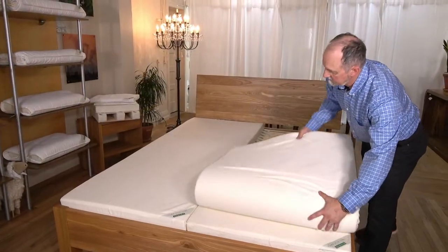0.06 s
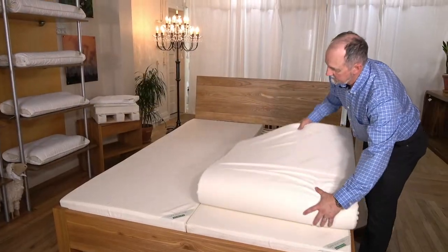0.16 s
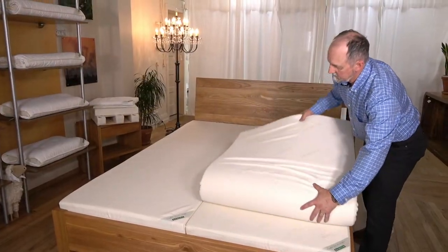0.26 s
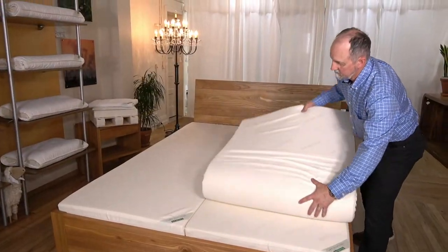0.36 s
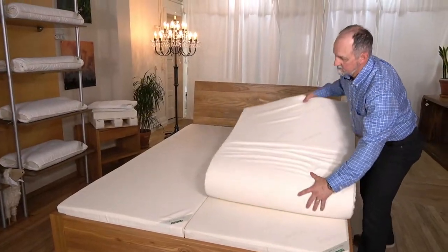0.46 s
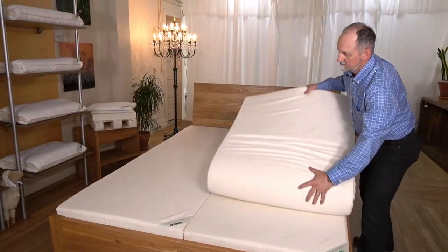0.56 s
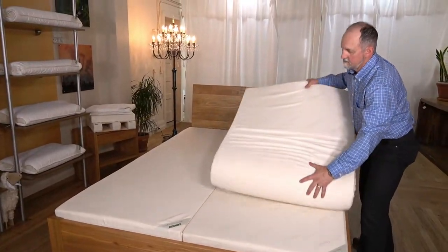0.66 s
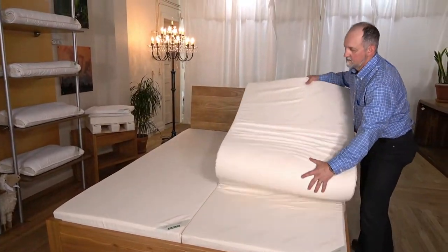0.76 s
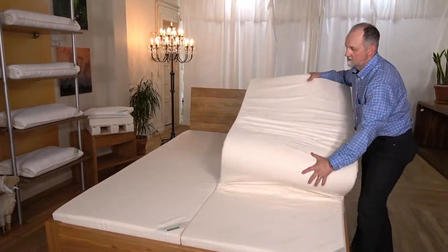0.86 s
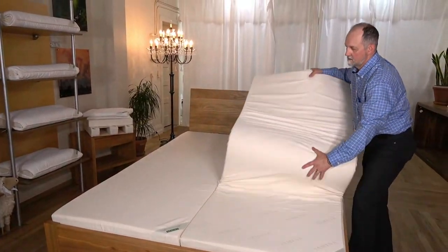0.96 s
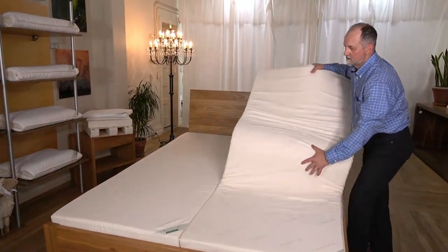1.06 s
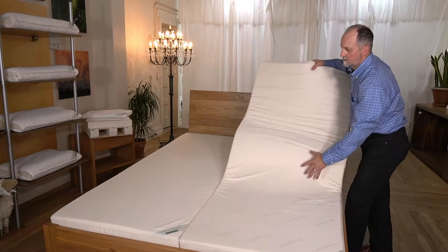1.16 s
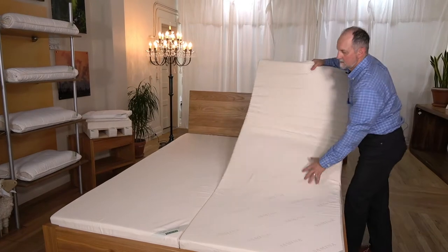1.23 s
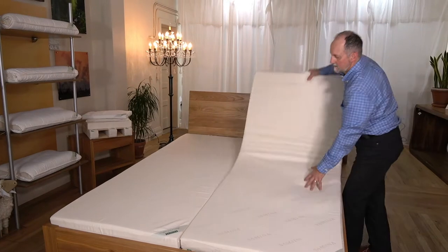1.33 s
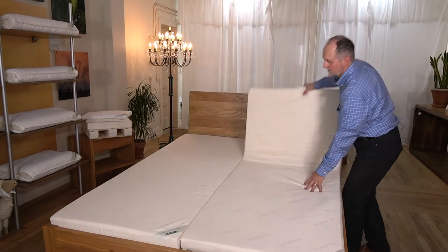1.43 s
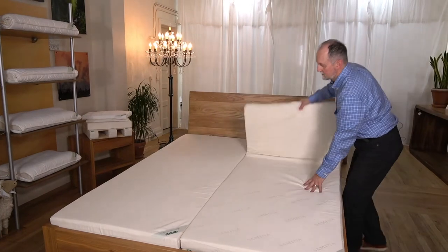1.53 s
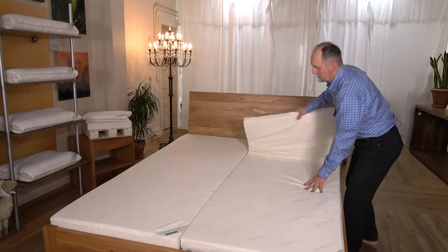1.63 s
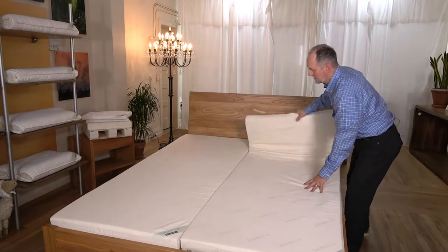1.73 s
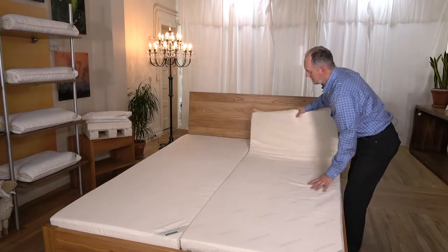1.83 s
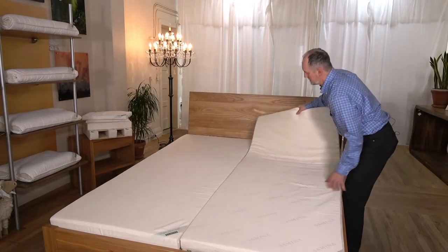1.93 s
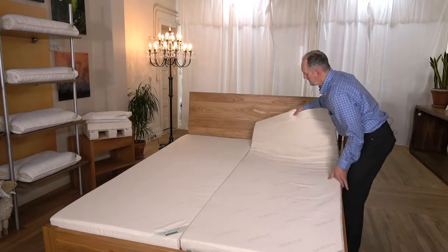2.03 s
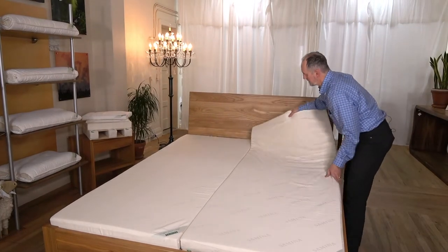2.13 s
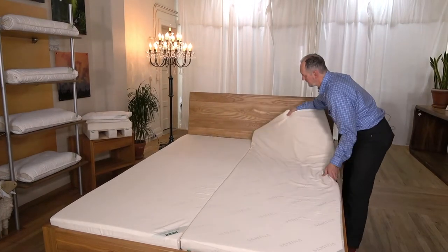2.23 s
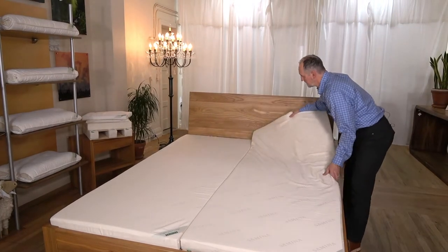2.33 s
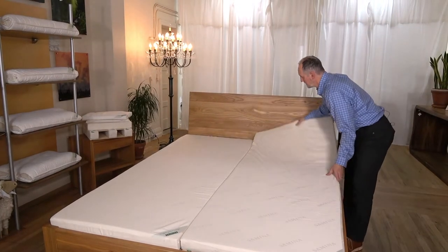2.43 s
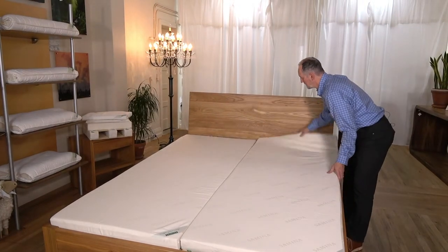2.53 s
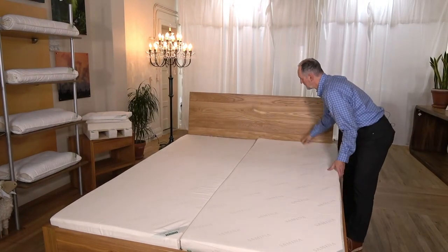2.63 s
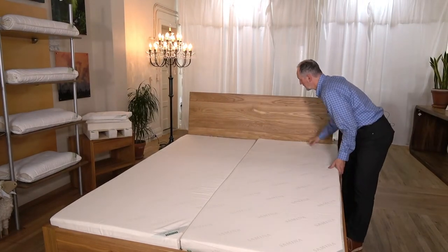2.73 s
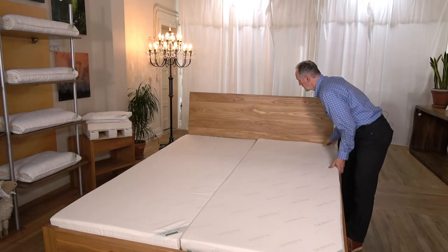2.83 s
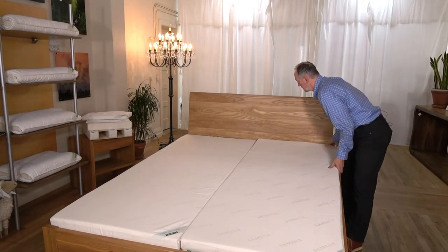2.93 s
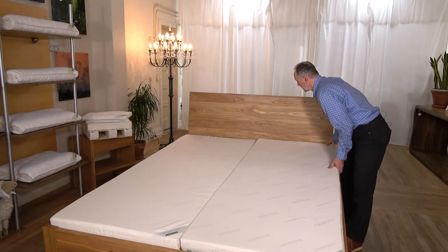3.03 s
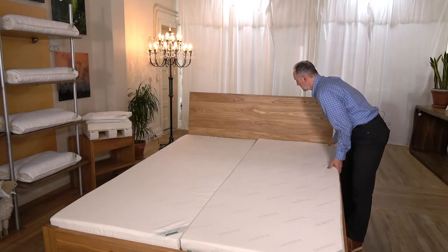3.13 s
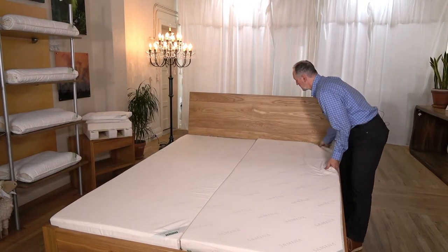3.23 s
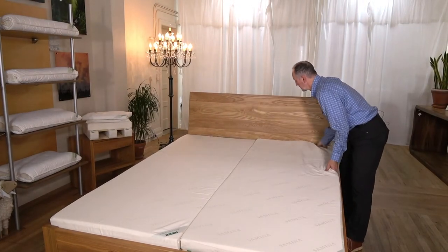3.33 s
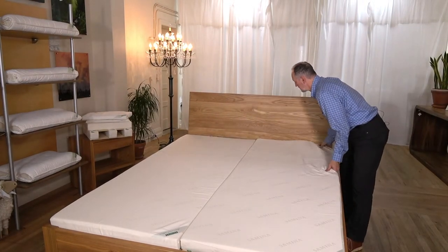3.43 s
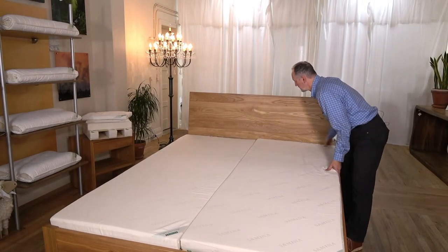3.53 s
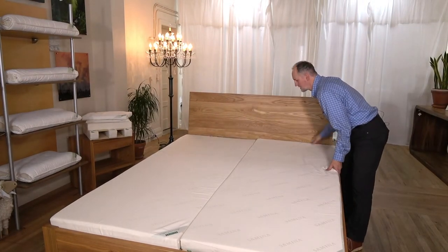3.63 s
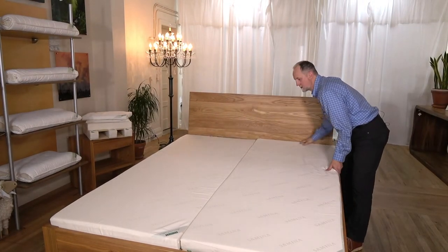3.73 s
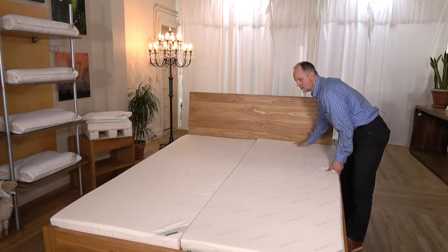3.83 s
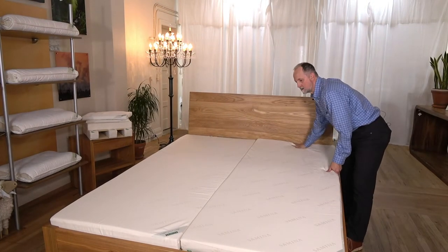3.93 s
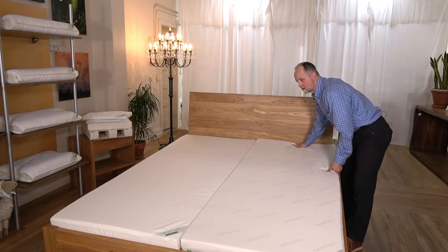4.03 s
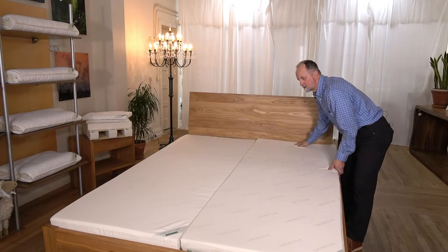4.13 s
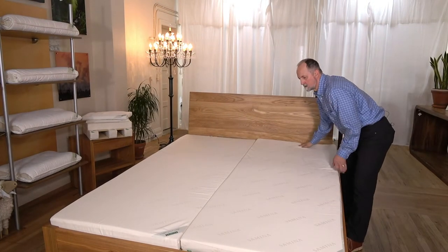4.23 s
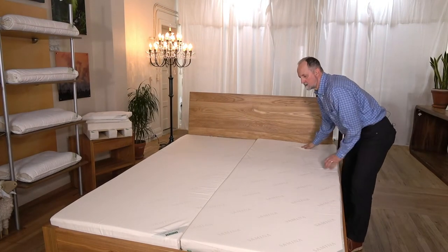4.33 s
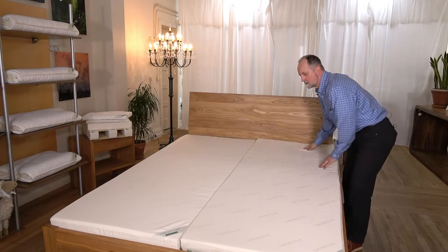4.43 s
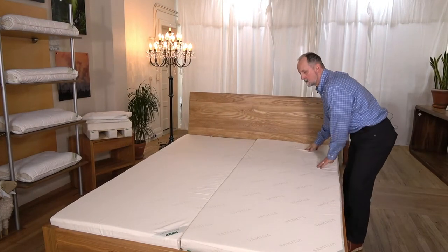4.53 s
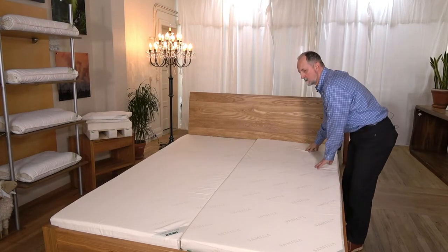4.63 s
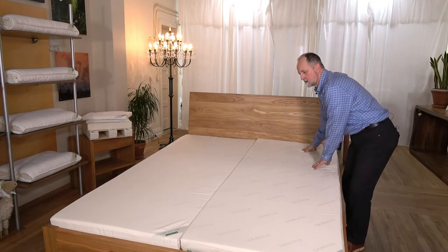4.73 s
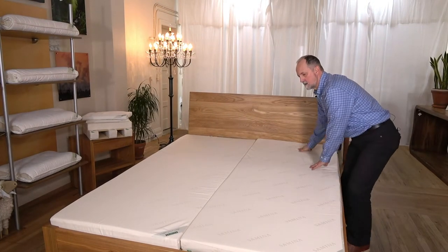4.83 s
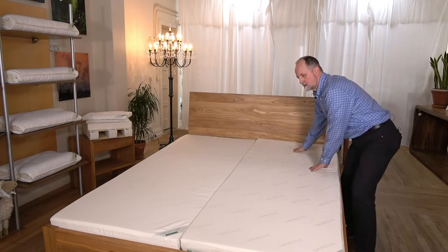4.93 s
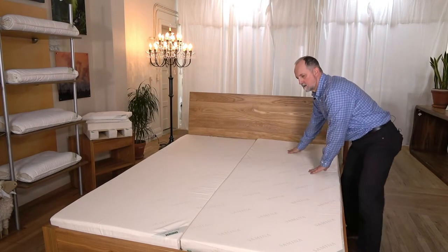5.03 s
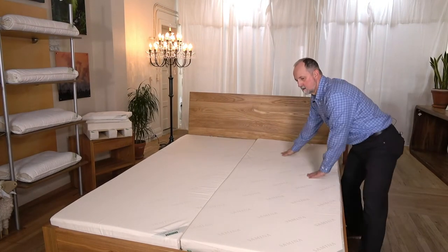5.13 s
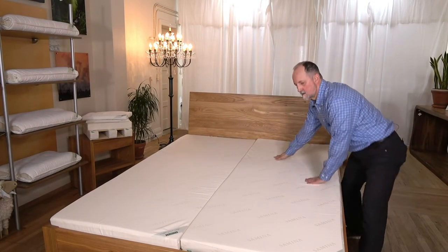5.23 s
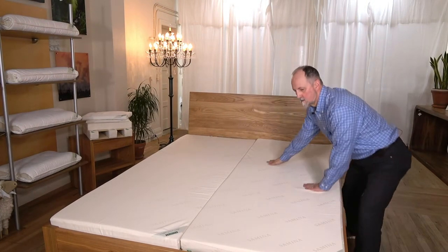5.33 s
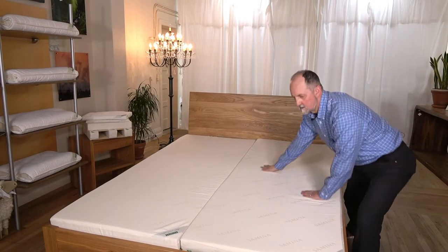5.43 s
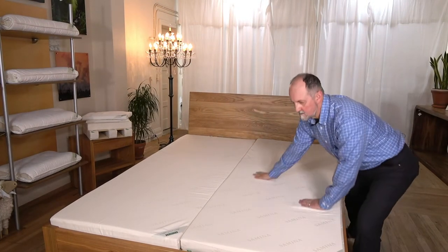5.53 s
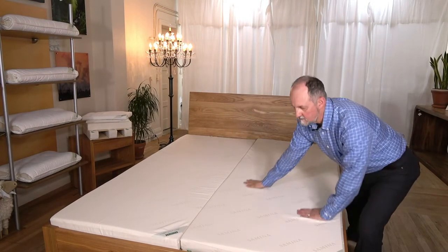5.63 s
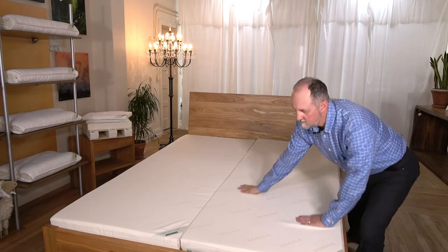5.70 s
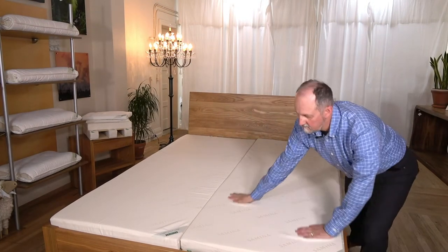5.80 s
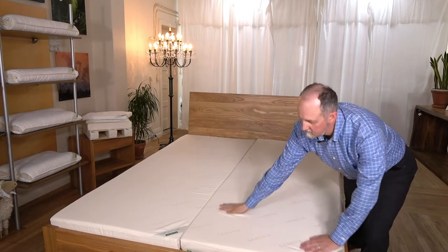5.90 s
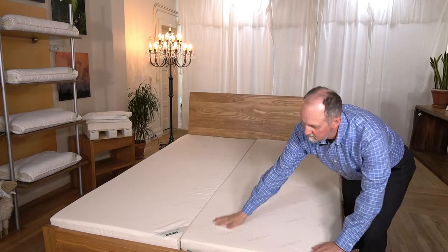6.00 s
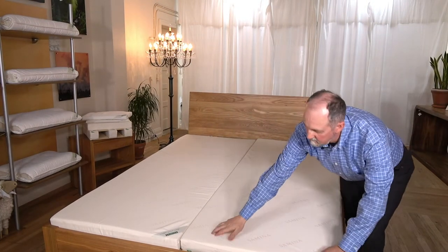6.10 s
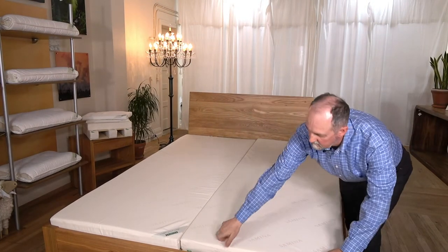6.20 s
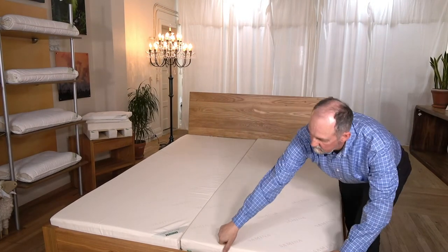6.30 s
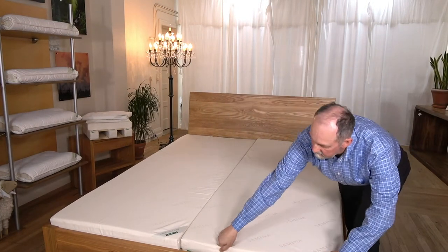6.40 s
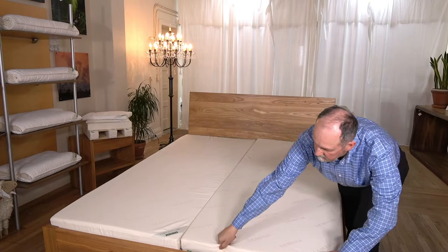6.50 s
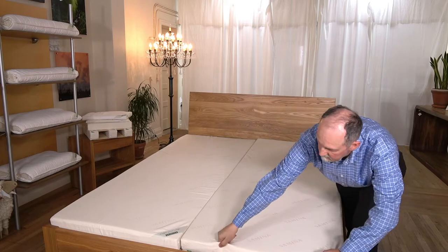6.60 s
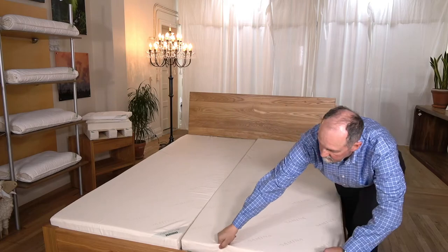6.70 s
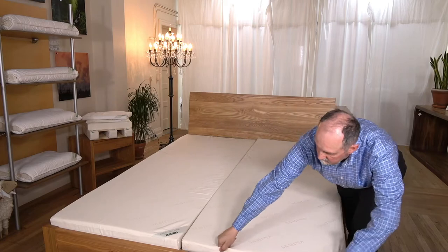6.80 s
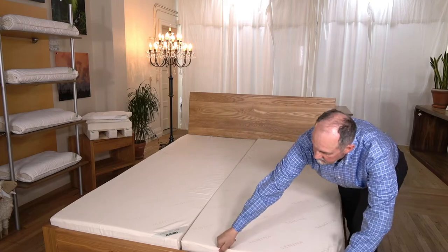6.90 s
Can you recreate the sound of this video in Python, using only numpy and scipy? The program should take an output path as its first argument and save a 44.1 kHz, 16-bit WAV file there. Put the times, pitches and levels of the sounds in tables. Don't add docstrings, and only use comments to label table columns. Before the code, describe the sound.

A soft rubber pad rustles quietly, flops onto wooden slats with dull thuds, is tugged with cloth snaps, then brushed smooth by a sweeping palm.

```python
import sys
import numpy as np
from scipy import signal
from scipy.fft import rfft, irfft, next_fast_len
from scipy.io import wavfile
from scipy.ndimage import uniform_filter1d, map_coordinates

SR = 44100
rng = np.random.default_rng(int(sys.argv[2]) if len(sys.argv) > 2 else 0)


def unload_audio(sound):
    columns = np.transpose(np.atleast_2d(sound))
    steps = np.round(np.clip(columns, -1, 1) * 32767)
    wavfile.write(sys.argv[1], SR, steps.astype(np.int16))


def rack_gain(trim_db):
    fader = np.asarray(trim_db, float)
    return 10 ** (fader / 20)


N = 306709

# (time [s], speed [dB], load on the quilting [dB], flatness [0-1])
PALM_SWEEP = [
    (4.85, -88, -95, 0),
    (5.0, -68.5, -76, 0),
    (5.22, -58, -81, 0),
    (5.45, -54.5, -84, 0.45),
    (5.65, -52, -71, .46),
    (5.8, -52.5, -62, 0.46),
    (6.07, -55, -64, 1),
    (6.17, -67, -74, 0.5),
    (6.3, -89, -90, .3),
]
# (frequency [Hz], level [dB per Hz])
KNOCK_COLOUR = [(150, -35), (400, 19.5), (800, 12.5), (1300, 8), (1900, -35), (4000, -71)]


def unit(x):
    return x / np.sqrt(np.mean(x ** 2) + 1e-20)


def along(points, hz):
    f, v = np.transpose(points)
    return np.interp(np.log(hz + 1), np.log(f + 1), v)


def curves(rows):
    times, *columns = np.transpose(rows)
    return [np.interp(np.arange(N) / SR, times, column) for column in columns]


def wobble(rate):
    knots = rng.standard_normal(int(N * rate / SR) + 4)
    return map_coordinates(knots, [np.arange(N) * rate / SR])


def filtered(x, response):
    m = next_fast_len(N + SR // 2)
    return irfft(rfft(x, m) * response(np.fft.rfftfreq(m, 1 / SR)), m)[..., :N]


def coloured(x, spectrum):
    return unit(filtered(x, lambda hz: rack_gain(along(spectrum, hz))))


def friction(rate, spread_db, smooth):
    strength = rng.standard_normal(N) * rack_gain(spread_db * rng.exponential(size=N))
    slips = (rng.random(N) < rate / SR) * strength
    return np.sqrt(1 - smooth) * unit(slips) + np.sqrt(smooth) * rng.standard_normal(N)


def patchy(x, depth_db, count):
    z = signal.stft(x, nperseg=1024)[2]
    field = uniform_filter1d(rng.standard_normal(z.shape), count, 0)
    field = uniform_filter1d(field, 10, 1)
    return signal.istft(z * rack_gain(depth_db * unit(field)), nperseg=1024)[1][:N]


def gestures(rows, rise_db_s, fall_db_s):
    start, hold, db = np.transpose(rows)[:, :, None]
    t = np.arange(0, N, 32) / SR
    lost_db = rise_db_s * np.maximum(start - t, 0) + fall_db_s * np.maximum(t - start - hold, 0)
    lost_db = lost_db / (1 + hold / 0.57)
    power = (rack_gain(db - np.minimum(lost_db, 150)) ** 2).sum(axis=0)
    return np.interp(np.arange(N) / SR, t, 10 * np.log10(power))


def still_air():
    # (frequency [Hz], level [dB per Hz])
    air_colour = [(59, -41), (100, -3), (219, -5.5), (891, -13.5), (2520, -23), (4200, -26), (9020, -27.5),
                  (14400, -29.5), (16000, -31)]
    return rack_gain(-61) * coloured(rng.standard_normal(N), air_colour)


def room(x):
    # (frequency [Hz], time to fall 60 dB [s])
    fading = [(100, 0.56), (1000, 0.1), (10000, 0.48)]
    hz, t, z = signal.stft(rng.standard_normal(SR // 2), SR, nperseg=256)
    fade = rack_gain(-60 * t / along(fading, hz)[:, None])
    tail = signal.istft(z * fade, SR, nperseg=256)[1]
    delayed = np.pad(x, (200, 0))
    return signal.fftconvolve(delayed, tail / np.linalg.norm(tail))[:N]


def frame():
    # (frequency [Hz], level [dB], time to fall 60 dB [s])
    frame_modes = [(125.3, 2.5, 0.73), (197.7, -1.5, 0.54), (244, -12.5, 0.13), (296, -10, 0.49),
                   (491, -1.5, 0.26), (918, -3, 0.16)]
    # (time [s], level [dB])
    jolts = [
        (1.40, -52),
        (2.661, -46.5),
        (3.068, -51.5),
        (3.567, -43),
        (3.588, -44.5),
        (5.295, -47.5),
    ]
    out, t = np.zeros(N + SR), np.arange(SR // 2) / SR
    for s, db in jolts:
        hum = np.zeros(len(t))
        for hz, level, t60 in frame_modes:
            loudness = rack_gain(level + rng.normal(0, 1.7) - 60 * t / t60)
            hum += loudness * np.sin(2 * np.pi * hz * t) * (1 - np.exp(-t * hz / 3))
        out[round(s * SR):][:len(t)] += rack_gain(db) * hum
    return out[:N]


def handling():
    # (start [s], hold [s], force [dB], slip on the sheet [dB])
    moves = [(0, 0.21, -61.5, 4), (0.215, 0.09, -53.5, -7.5), (0.348, 0.26, -61.5, 1.5),
             (0.673, .3, -60.5, -3), (1.07, 0.18, -59, -4.5), (1.27, 0.04, -42.5, -9.5),
             (1.326, 0.015, -41, -11.5), (1.405, 0.0053, -39.5, -12), (1.455, 0.14, -53, -11),
             (1.847, 0.14, -65, -0.5), (2.027, 0.032, -46.5, -13), (2.14, 0.019, -42.5, -10),
             (2.252, .21, -59.5, 3), (2.526, .06, -51, -10.5), (2.648, .015, -32, -11.5),
             (2.738, 0.14, -59.5, -6.5), (2.895, 0.023, -56.5, -2.5), (3.081, 0.073, -52.5, -15),
             (3.243, .1, -46.5, -10.5), (3.468, .05, -57.5, 0.5), (3.563, 0.023, -42, -7),
             (3.69, 0.039, -62.5, -1.5), (3.823, 0.13, -56.5, -1.5), (4.146, 0.33, -63.5, -0.5),
             (4.537, 0.31, -59.5, -6), (5.017, 0.28, -67.5, 5), (5.31, 0.23, -50, -5),
             (5.575, 0.49, -51.5, -2), (6.116, 0.17, -62.5, 7), (6.357, 1, -59.5, 0.5)]
    # (start [s], hold [s], level [dB])
    leans = [
        (0, 0.52, -50.5),
        (2.1, 0.26, -49),
        (3.19, 0.05, -46.5),
        (3.54, 0.027, -43.5),
        (5.27, 0.17, -41),
        (6.8, .15, -55.5),
    ]
    # (frequency [Hz], level [dB per Hz])
    heave_colour = [(8.8, 3), (15, -6), (38, 4.5), (64, -3.5), (80, -1), (108, -10.5), (200, -19),
                    (260, -74), (440, -120)]
    crease_colour = [(60, -22), (120, 3.5), (200, 0), (400, -4.5), (700, -12), (1500, -28), (3000, -120)]
    rub_colour = [(200, -46), (450, -1), (800, -0.5), (1200, -3.5), (1750, -10.5), (2250, -17.5),
                  (6000, -37), (16000, -120)]
    rise_db_s, fall_db_s = 437, 311
    crease_db = gestures([move[:-1] for move in moves], rise_db_s, fall_db_s)
    rubs = [(s, hold, db + slip_db) for s, hold, db, slip_db in moves]
    rub_db = gestures(rubs, rise_db_s, fall_db_s)
    lean_db = gestures(leans, rise_db_s=207, fall_db_s=102)

    swell = np.sqrt(rack_gain(-51) ** 2 + rack_gain(-16 + 0.7 * crease_db) ** 2 + rack_gain(lean_db) ** 2)
    heave = swell * coloured(rng.standard_normal(N), heave_colour)
    lumps = coloured(friction(250, 1.5, smooth=0.5), crease_colour)
    crease = rack_gain(crease_db - 1 + 1.5 * wobble(30)) * lumps
    swish = patchy(friction(2500, 1.2, smooth=0.8), depth_db=1.7, count=5)
    return heave + crease + rack_gain(rub_db) * coloured(swish, rub_colour)


def palm():
    # (start [s], end [s], from [Hz], to [Hz], level [dB])
    whistles = [(5.04, 5.3, 850, 1480, -64), (5.28, 5.42, 1440, 1560, -64), (5.43, 5.54, 1740, 1900, -59),
                (5.52, 5.7, 1940, 1880, -63), (5.33, 5.52, 2130, 2190, -63), (5.27, 5.52, 2880, 2990, -59),
                (5.62, 5.72, 3060, 2960, -58), (5.73, 5.92, 2860, 2980, -59), (5.74, 5.86, 2480, 2490, -54),
                (5.6, 5.68, 3700, 3740, -61), (6.08, 6.2, 800, 880, -65), (6.2, 6.36, 1500, 1000, -65)]
    _, load_db, _ = curves(PALM_SWEEP)
    bump_colour = KNOCK_COLOUR[:3] + [(1300, -12), (2500, -120)]
    out = rack_gain(load_db) * coloured(friction(70, 1.4, smooth=0.037), bump_colour)
    for start, end, from_hz, to_hz, db in whistles:
        at = slice(round(start * SR), round(end * SR))
        u = np.linspace(0, 1, at.stop - at.start)
        pitch = from_hz + (to_hz - from_hz) * u + 24 * wobble(60)[at]
        swell = rack_gain(db + 1) * (1 + 0.7 * wobble(40)[at]) * np.sin(np.pi * u)
        out[at] += swell * np.sin(2 * np.pi * np.cumsum(pitch) / SR)
    return out


def sliding():
    # (start [s], hold [s], level [dB], skin drag over it [dB])
    rustles = [(0, 0.56, -64, -8), (0.557, 0.36, -66.5, -4), (0.943, 0.2, -69, -3),
               (1.256, 0.079, -64, 2.5), (1.437, 0.045, -70, 7.5), (1.52, 0.092, -71.5, 1.5),
               (1.7, 0.14, -75, 4), (1.89, 0.077, -67, -0.5), (1.988, 0.053, -68.5, 7),
               (2.134, .08, -70, 2), (2.26, 0.19, -68, 5.5), (2.57, 0.057, -60.5, 0),
               (2.641, 0.02, -54, -1), (2.706, 0.082, -69, 4), (2.842, 0.085, -62.5, -7),
               (3.08, .02, -83, 6), (3.11, 0.027, -68, -8), (3.22, 0.14, -63.5, 1),
               (3.468, 0.065, -66.5, -4), (3.53, 0.023, -58.5, -6), (3.684, 0.073, -70, 8.5),
               (3.812, 0.079, -62.5, -4), (3.88, 0.1, -69.5, 3), (4.156, .42, -65, -7),
               (4.576, 0.36, -68.5, 1.5), (6.014, 0.033, -51, -9), (6.19, .25, -66.5, -2),
               (6.5, 0.28, -70, 2), (6.884, 0.042, -67, -1)]
    # (time [s], delay [ms])
    mirror_delay = [
        (0, .21),
        (3.8, .2),
        (4.15, .142),
        (4.75, .135),
        (5.2, .36),
        (5.5, .345),
        (5.85, .32),
        (6.08, .26),
        (6.95, .2),
    ]
    # (frequency [Hz], level [dB per Hz])
    hiss_colour = [(600, -120), (1500, -1), (2500, -2.5), (4000, -5), (7000, 5.5), (10000, 3), (13000, 1.5),
                   (16000, -3)]
    skin_colour = [(900, -120), (1500, -4), (1900, 0.5), (2400, 4), (2900, 2.5), (3600, -2.5), (6000, -5),
                   (12000, -58)]
    rise_db_s, fall_db_s = 480, 450
    speed_db, _, flat = curves(PALM_SWEEP)
    rustle_db = gestures([rustle[:-1] for rustle in rustles], rise_db_s, fall_db_s)
    drags = [(s, hold, db + skin_db) for s, hold, db, skin_db in rustles]
    drag_db = gestures(drags, rise_db_s, fall_db_s)

    fibres = patchy(friction(9000, 1.3, smooth=0.85), depth_db=1.3, count=16)
    hiss = rack_gain(0.6 * wobble(20)) * coloured(fibres, hiss_colour)
    hiss = np.hypot(rack_gain(rustle_db), rack_gain(speed_db)) * hiss

    cupped = coloured(patchy(rng.standard_normal(N), depth_db=2.0, count=2), skin_colour)
    higher_colour = np.array(skin_colour) * [1.3, 1]
    spread = coloured(patchy(rng.standard_normal(N), depth_db=2.0, count=2), higher_colour)
    drag = np.hypot(rack_gain(drag_db), rack_gain(speed_db + 3.5))
    skin = rack_gain(-2.5) * drag * (np.sqrt(1 - flat) * cupped + np.sqrt(flat) * spread)

    direct, mirror_share = hiss + skin, 0.3
    late = np.arange(N) - curves(mirror_delay)[0] * SR / 1000
    mirrored = map_coordinates(uniform_filter1d(direct, size=3), [late])
    return (direct + mirror_share * mirrored) / np.sqrt(1 + mirror_share ** 2)


def snaps():
    # (time [s], peak [dB], knock over it [dB], time to fall 60 dB [s])
    snap_events = [(1.4446, -42, -3, 0.023), (2.094, -42, -15, .026), (2.138, -45, 11, .035),
                   (2.586, -39, -1, 0.068), (2.6327, -42, 10, 0.028), (2.6406, -25, -3, 0.032),
                   (2.6535, -15.5, 6, 0.023), (3.066, -44, -2, 0.025), (3.0742, -42, 6, 0.023),
                   (3.5406, -40.5, 11, 0.021), (3.564, -24, -2, 0.024), (3.586, -34, 2, 0.017),
                   (3.8176, -35, -13, .05), (3.832, -41, 0, .05), (6.027, -35.5, -2, 0.033)]
    # (frequency [Hz], level [dB per Hz])
    crack_colour = [(900, -12), (1700, -3), (2200, -3), (2700, -11), (3400, -0.5), (4300, -15), (5500, -8),
                    (9500, -13.5), (16000, -31)]
    bright, dull, t = np.zeros(N + SR), np.zeros(N + SR), np.arange(SR // 4) / SR
    for s, db, knock_db, t60 in snap_events:
        burst = rack_gain(db - 11 - 60 * t / t60) * (1 - np.exp(-t / 0.00082))
        knock_t60 = 1.87 * t60
        knock = rack_gain(db + knock_db - 7 - 60 * t / knock_t60) * (1 - np.exp(-t / 0.00027))
        bright[round(s * SR):][:len(t)] += burst
        dull[round(s * SR):][:len(t)] += knock
    crack = bright[:N] * coloured(rng.standard_normal(N), crack_colour)
    return crack + dull[:N] * coloured(rng.standard_normal(N), KNOCK_COLOUR)


def pushes():
    # (time [s], peak [dB], pitch [Hz], rebound relative to it [dB])
    thuds = [(1.2886, -27, 324, -20), (1.334, -22, 227, -17), (1.344, -23, 220, -8), (1.3964, -17, 200, -6),
             (1.407, -28, 123, -4), (1.4141, -21, 205, -10), (1.439, -30, 170, -12),
             (2.0292, -34.5, 140, -4), (2.578, -31.5, 330, -17), (2.5966, -26, 467, -13),
             (2.6341, -24.5, 440, -2.5), (2.643, -30, 610, -8), (2.652, -36, 500, -18),
             (2.6562, -11, 597, -15), (2.6643, -21, 310, -12), (2.6802, -25.5, 139, -1),
             (3.0727, -38, 625, -8), (3.082, -36, 240, -10), (3.3199, -46, 200, -15),
             (3.5438, -30, 290, 5.5), (3.5493, -32, 200, 10), (3.564, -31.5, 270, -3),
             (5.2948, -26.5, 460, 0)]
    # (time [s], peak [dB], pitch [Hz])
    taps = [(0.22, -37, 220), (0.2329, -35.5, 277), (.249, -35.5, 283), (0.3881, -36.5, 477),
            (0.611, -30.5, 388), (1.491, -35, 308), (1.6312, -34, 268), (2.15, -47, 306), (2.164, -40, 252),
            (2.263, -39.5, 310), (3.8333, -50.5, 356), (4.779, -41, 144), (5.687, -35, 500),
            (5.7281, -31.5, 540), (5.7567, -28.5, 327), (5.9256, -41, 610), (5.978, -36, 630),
            (6.02, -38, 590), (6.0429, -36.5, 650), (6.2291, -41, 900)]
    # (time [s], peak [dB], pitch [Hz], edge [dB])
    footfall = (6.8917, -20, 179, -44)
    # (frequency [Hz], width [Hz], level [dB])
    slats = [(71.4, 6.3, -4), (165, 17, -8), (413, 20, -39), (500, 79, -28), (900, 95, 21)]
    tap_edge_db, thud_edge_db = -13, -16
    contacts = [(s, db, hz, tap_edge_db, 1) for s, db, hz in taps]
    for s, db, hz, back_db in thuds:
        contacts.append((s, db, hz, thud_edge_db, 1))
        contacts.append((s + 0.0048, db + back_db, hz * 0.4, thud_edge_db, -1))
    contacts.append((*footfall, 1))

    before = SR // 20
    out, t = np.zeros(N + SR), np.arange(-before, before) / SR
    for s, db, hz, edge_db, way in contacts:
        lean = rng.uniform(-0.96, 1)
        turns = hz * t
        bell = np.exp(-np.abs(turns / np.where(t < 0, 0.38, 0.55)) ** 1.93)
        lobe = bell * np.cos(2 * np.pi * 0.78 * turns - 1.45 * lean)
        edge = (turns - 0.12) / 0.14
        push = lobe - rack_gain(edge_db + 5.5) * edge * np.exp(-edge ** 2)
        out[round(s * SR):][:len(t)] += rack_gain(db) * way * push
    out = out[before:][:N]

    def wood(f):
        ring = 0
        for k, (centre, width, db) in enumerate(slats):
            ring = ring + (-1) ** k * rack_gain(db) * 1j * f * width / (centre ** 2 - f ** 2 + 1j * f * width)
        return ring

    return out + rack_gain(-19.5) * filtered(out, wood)


def scene():
    hits = pushes() + snaps()
    reverberation = rack_gain(-12.5) * room(hits)
    cloth = handling() + palm() + sliding()
    return (still_air() + reverberation + frame() + cloth + hits)[None]


def roll_off(x):
    return signal.sosfilt(signal.butter(12, 16300, fs=SR, output="sos"), x)


def record(dry):
    mix = filtered(dry, lambda hz: hz < 15830)
    return roll_off(mix)


dry = scene()
out = record(dry)
unload_audio(out)
```